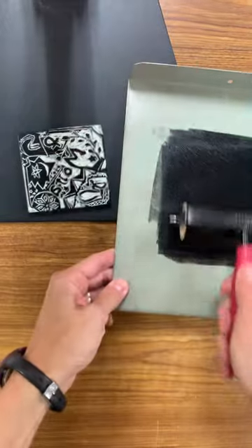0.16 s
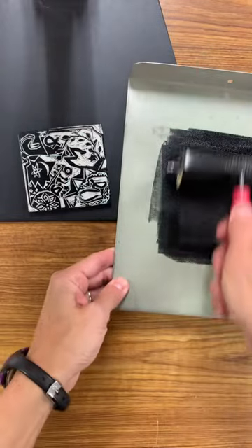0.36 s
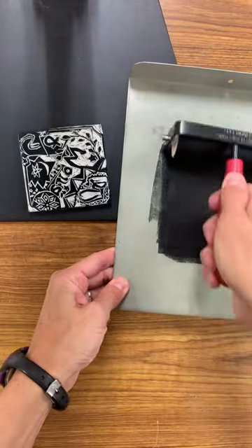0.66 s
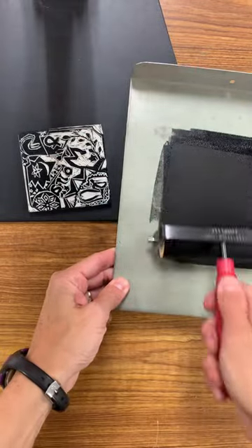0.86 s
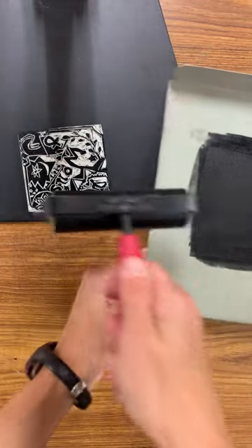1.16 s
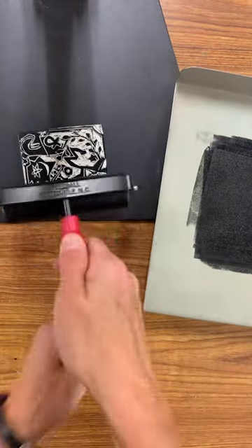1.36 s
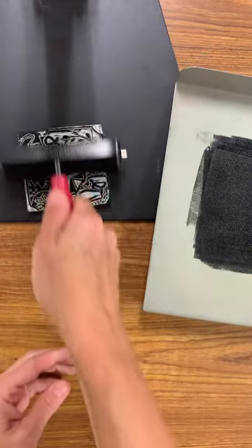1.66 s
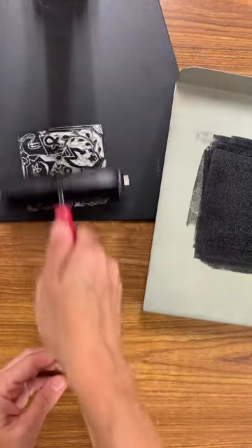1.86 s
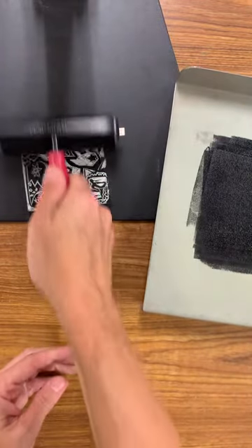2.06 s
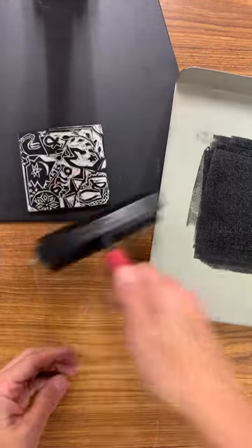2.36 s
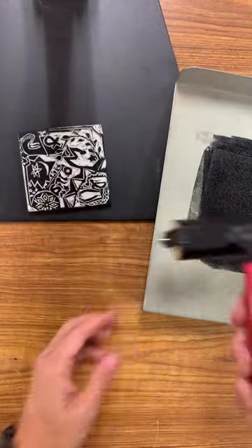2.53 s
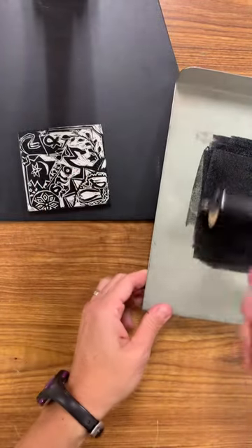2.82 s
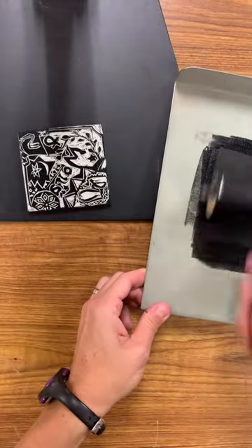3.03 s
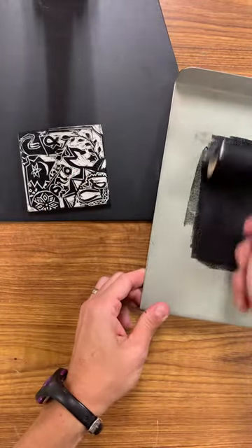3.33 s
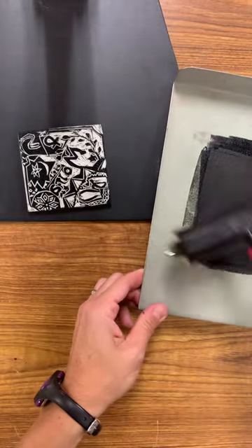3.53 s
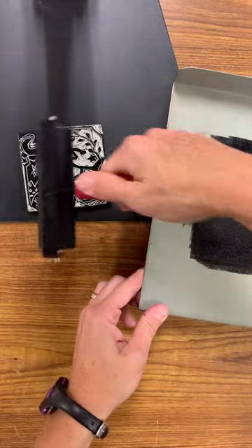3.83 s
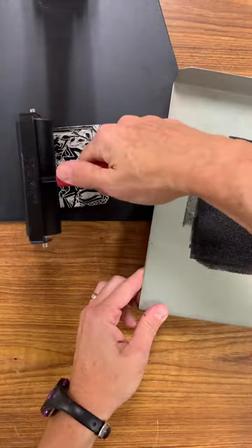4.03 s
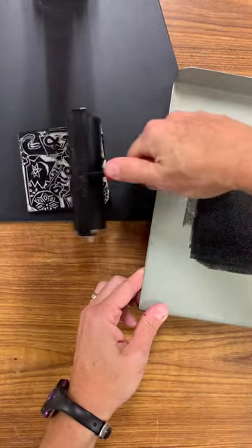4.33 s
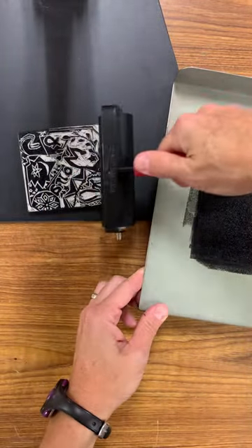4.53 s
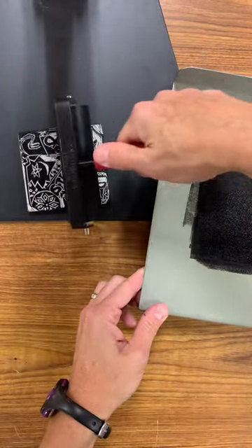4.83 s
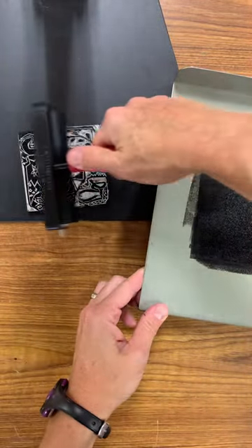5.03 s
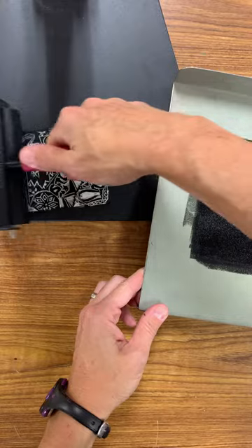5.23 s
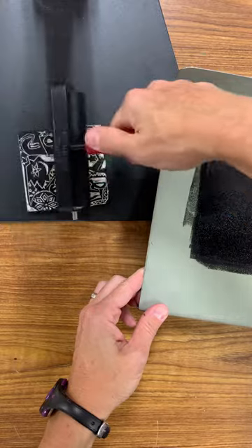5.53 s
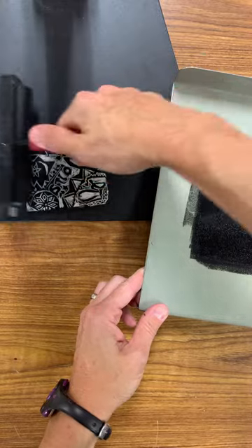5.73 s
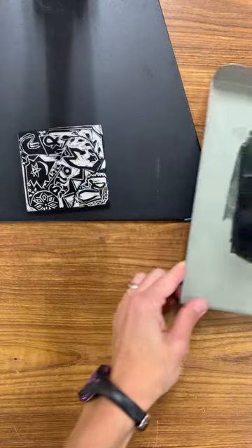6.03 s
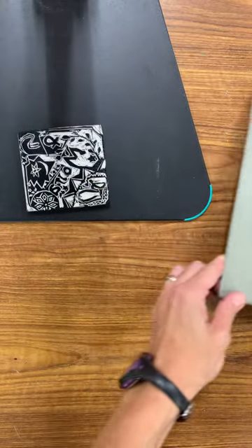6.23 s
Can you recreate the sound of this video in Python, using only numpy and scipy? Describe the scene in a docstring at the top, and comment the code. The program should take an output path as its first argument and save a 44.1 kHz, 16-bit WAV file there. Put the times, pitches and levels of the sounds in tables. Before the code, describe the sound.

A rubber roller makes quick, sticky, hissing strokes through ink on a metal tray. The tray scrapes and clanks, then the roller rumbles softly over a carved block, thumping the wooden table. After a sharp clank come more sticky strokes, then three slower passes on the block, each starting with a click and thump. Finally the tray clanks and slides. Heard close from above in a quiet, humming room.

```python
"""Inking a block with a rubber roller

A rubber roller runs through sticky ink on a metal tray and over a carved block, on a wooden table.
Ink threads snap as a dense hiss, and surface bumps drive the bodies below into a rumble.
Impacts excite damped modes: the roller frame ticks, the table top thumps and the tray clanks.
The dragged tray judders by friction. A quiet room hums; two microphone ports hear it from above."""
import sys
import numpy as np
from scipy import signal
from scipy.fft import rfft, irfft
from scipy.io import wavfile
from scipy.ndimage import uniform_filter1d, map_coordinates

SR = 44100
rng = np.random.default_rng(int(sys.argv[2]) if len(sys.argv) > 2 else 0)


def put_to_file(sound):
    """Save the sound as 16-bit audio at rate SR, in the file named by the first command-line argument."""
    columns = np.atleast_2d(sound).T  # one column per channel
    safe = np.clip(columns, -1, 1)
    whole_steps = np.round(safe * 32767)
    wavfile.write(sys.argv[1], SR, whole_steps.astype(np.int16))


N = 281221

# Ink hiss, one curve a stroke: time_s, thick_threads_gain_db, thin_threads_relative_db
INK_HISS = [
    [(0.14, -50.5, 8), (0.256, -51, 3.5), (0.264, -56, 6), (0.298, -53.5, 6), (0.327, -76, 3)],
    [(0.327, -76, 1), (0.353, -52.5, 8), (0.437, -48.5, 0), (0.445, -42.5, 1), (0.473, -56, 8),
     (0.507, -73, 2)],
    [(0.507, -72, 2), (0.529, -56.5, 14), (0.569, -44, 7), (0.583, -51, 9), (0.657, -48.5, 5.5),
     (0.693, -69, 4)],
    [(0.693, -76, 4), (0.715, -52.5, 12.5), (0.739, -49.5, 4), (0.853, -50, 4.5), (0.875, -51, 3)],
    [(1.58, -53, 2), (1.598, -60, 3), (1.624, -65, 15.5), (1.676, -59.5, 12.5), (1.734, -68.5, 11),
     (1.778, -89, 7)],
    [(1.778, -87, 9), (1.802, -78, 14), (1.822, -65, 15), (1.846, -55.5, 3), (1.886, -57.5, 4),
     (1.92, -69.5, 7), (1.951, -94, 7)],
    [(1.951, -93, 10), (1.977, -66.5, 11.5), (2.033, -56, 11), (2.075, -61.5, 9), (2.13, -80, -3)],
    [(2.13, -78.5, -3), (2.162, -71.5, 11.5), (2.206, -57, 11), (2.236, -58.5, 5), (2.265, -52, -5)],
    [(2.67, -85.5, -1), (2.688, -66, -8), (2.712, -66.5, -13.5), (2.742, -73, -12), (2.75, -49, -24)],
    [(2.83, -52, 1), (2.894, -58.5, 7), (2.934, -52.5, 4), (2.956, -67, 5), (2.965, -69, 0)],
    [(2.965, -65, 2), (2.991, -52.5, 8), (3.055, -48.5, 1), (3.073, -46, 1), (3.119, -54, 3),
     (3.145, -75, 4)],
    [(3.145, -64, 1), (3.161, -54, 0), (3.173, -53.5, 10), (3.201, -47.5, 6), (3.291, -49.5, 5),
     (3.317, -73, 4)],
    [(3.317, -75, 5), (3.333, -53, 6), (3.345, -51.5, 6.5), (3.433, -48, 3), (3.461, -53, 6.5),
     (3.485, -64, -4), (3.51, -72, -3)],
    [(4.12, -50, -6), (4.14, -60.5, 1), (4.242, -72, 3.5), (4.284, -70, 3), (4.358, -79, 10),
     (4.394, -74, 5.5), (4.46, -74, 2)],
    [(4.93, -60, 7.5), (4.982, -65.5, 6), (5.098, -72.5, 20), (5.17, -74, 17.5), (5.184, -72, 14),
     (5.19, -69, 11)],
    [(5.585, -47, -1), (5.591, -58, 7), (5.631, -66, 10.5), (5.699, -68, 14), (5.711, -59, -9),
     (5.719, -76, 9), (5.735, -78, 0)],
]
# Spectrum of snapping ink: frequency_hz, gain_db
INK_SPECTRUM = [(1500, 0.5), (3000, -20), (4000, -6), (4500, -13), (6000, 0), (9000, 0.5), (12000, 0.5),
                (15500, 1.5)]
# Strokes on the tray: start_s, end_s, fastest_at_fraction, tray_rumble_db, table_rumble_db
TRAY_STROKES = [(.135, .325, 0.52, -46, -38.5), (.335, .503, 0.4, -44.5, -44.5),
                (.513, .69, 0.4, -43, -52.5), (.7, .897, 0.64, -47, -44.5), (2.67, 2.75, .7, -54, -62.5),
                (2.81, 2.962, 1, -50.5, -44.5), (2.972, 3.142, 0.4, -42.5, -42.5),
                (3.15, 3.313, 0.46, -46.5, -46), (3.325, 3.505, 0.8, -48.5, -43)]
# Strokes on the block: start_s, end_s, fastest_at_fraction, block_rumble_db, table_rumble_db
BLOCK_STROKES = [(1.57, 1.78, 0.7, -48.5, -34.5), (1.785, 1.945, 0.43, -46, -35.5),
                 (1.96, 2.13, 0.43, -50, -31), (2.135, 2.28, 0.38, -43.5, -30.5),
                 (4.105, 4.49, .1, -56, -41.5), (4.91, 5.2, 0.83, -58, -38),
                 (5.57, 5.735, 0.96, -50.5, -34.5)]
# Knocks of the loose axle: time_s, peak_db, lower_mode_relative_db
AXLE_KNOCKS = [(1.682, -51, -2), (1.72, -55, 0), (1.77, -49, 0), (4.135, -48.5, -3), (4.17, -55.5, 3.5),
               (4.206, -44.5, -0.5), (4.253, -53, -1), (4.285, -44, 5), (4.334, -51.5, -3.5),
               (4.369, -58, 2.5), (4.406, -56, 4.5), (4.435, -61, 5), (4.48, -58, 2), (5.054, -48.5, -4),
               (5.071, -57, 0.5), (5.099, -57, -0.5), (5.146, -56.5, 4.5), (5.174, -56.5, 2),
               (5.635, -51, -2.5), (5.655, -49, -4), (5.69, -48, -4), (5.726, -40.5, -2.5)]
# Bumps over the ridges of the block: time_s, peak_db
RIDGE_KNOCKS = [(1.693, -38), (1.837, -37.5), (1.871, -54.5), (2.054, -38.5), (2.145, -38), (2.171, -36),
                (2.259, -42), (4.099, -33.5), (4.203, -53), (4.284, -50), (4.36, -41), (4.488, -45),
                (4.91, -39), (5.051, -51.5), (5.214, -44.5)]
# Ticks of the frame on its axle: time_s, peak_db, top_mode_relative_db, crack_s, rattle_relative_db
FRAME_TICKS = [(0.0993, -12.5, -3, 0.0053, -8), (0.107, -36, 7.5, 0.003, -15), (0.1176, 1, 5, 0.00079, -32),
               (0.125, -16, -16, 0.0021, -23), (0.8804, -31.5, -25, 0.0043, -4),
               (1.555, -15.5, 4, 0.0077, -13), (2.271, -23.5, -26.5, 0.0024, -16),
               (2.461, -19, -25, 0.0031, -7.5), (2.483, -30, -1, 0.0041, -12),
               (2.759, -15.5, -17, 0.0082, -33), (2.777, -5.5, -9, 0.003, -8),
               (4.0883, -8, 4.5, 0.0046, -19), (4.466, -48.5, -9, 0.0072, -25),
               (4.8987, -7, 6.5, 0.0037, -15.5), (5.199, -25, 1, 0.0055, -5.5),
               (5.557, -9, 2.5, 0.0055, -17), (5.701, -35, -17, 0.0028, -5),
               (6.33, -25.5, -21, 0.0026, -32)]
# Blows on the tray: time_s, peak_db, clatter_s, ring_time_fraction, then gain_db for each of 7 zones
TRAY_BLOWS = [(.004, -20, 0.012, 0.14, -5.5, -6.5, 1, -7, -12, -9, -9),
              (.024, -19.5, 0.013, .2, 7.5, 1, 1, -9, -13, -8.5, -19),
              (0.046, -18.5, 0.016, .3, 4.5, -6, 0, -9.5, -8.5, -9.5, -19.5),
              (.113, -15, 0.0087, 0.5, -1.5, 4.5, 1, -4, -3, -3, -8.5),
              (.122, -13.5, 0.009, 0.11, 14.5, 0.5, -0.5, -6.5, -2.5, -7.5, -11),
              (.874, -27.5, 0.014, .2, 11, 1, 2.5, -19.5, -20.5, -20.5, -18),
              (1.063, -26.5, 0.018, .2, -7.5, -11, 1.5, -8, -17.5, -5.5, -7.5),
              (1.083, -16.5, .012, 0.22, -15, -7, 1, -9, -17.5, -2.5, -3),
              (1.106, -21.5, 0.011, 0.17, -10.5, -15, -5.5, 5, -9, 4.5, -3),
              (1.133, -15.5, 0.014, 0.25, -16, -9, 0, 1, -9, -5, -8),
              (1.143, -6.5, .014, 0.37, -9, 2.5, 4, -22, -24, -13.5, -23),
              (1.181, -23.5, 0.0081, 0.25, -5, -6, -3.5, -13.5, -18, -9.5, -10),
              (1.284, 0.5, .015, 0.54, -11, -7.5, 0.5, 2, -2.5, 4, 6.5),
              (1.303, -7.5, 0.012, 0.6, -6.5, -9.5, -0.5, 1.5, -5.5, -2, 10.5),
              (1.366, -10.5, 0.0096, 0.59, -2, -6.5, 0, -5, -1, -2.5, -6),
              (2.339, -46.5, .011, .2, 0.5, -2, 0.5, -0.5, -1, 0, -9.5),
              (2.768, -9.5, 0.016, .15, -4.5, -8, -2.5, 4, -2, 5, 0),
              (2.7836, 4, 0.0064, .12, -5, -9, -1, 3.5, 8, 6, 12),
              (3.045, -22, 0.0059, 0.433, 2, -4, -1, -4.5, -12, -6, -5.5),
              (3.158, -12, 0.01, 0.238, 2.5, -6, 1.5, -4, -9, -6, -9),
              (3.34, -29.5, 0.0062, 0.37, 4, 3.5, 2.5, -10, -10, -11, -22.5),
              (3.517, -17, 0.0048, 0.72, -28, -1, 4.5, 3.5, -3.5, -13, -25.5),
              (5.823, 2.5, 0.007, 0.185, -4.5, -10, -1, -1, 7.5, -4.5, 9),
              (5.845, -19.5, 0.019, .3, 6, 11, -8, -7, -9, -9, 2),
              (5.868, -21, .02, .3, 3, 5, -2, -13, -19, -9, 3),
              (5.895, -12.5, 0.018, 0.052, 8, 9, 1, -17, -13, -20, -3)]
# Low thumps of the table top from landings, rolling bumps and tray knocks:
# time_s, peak_db, ring_time_ratio, lowest_mode_relative_db
TABLE_THUMPS = [(0.118, -16.5, 1.5, 14.5), (0.147, -18.5, .56, 1), (0.199, -32.5, .9, -4.5),
                (0.883, -24, .9, 5.5), (1.141, -32, 1.7, -3.5), (1.28, -26.5, 1.5, -6.5),
                (1.563, -13, .62, 3.5), (1.618, -22, 1.2, 0.5), (1.69, -24, .9, 10.5),
                (1.848, -23, 1.05, 20.5), (1.884, -24, 1.4, 7), (2.019, -23.5, .9, 10.5),
                (2.205, -17, 1.8, -6.5), (2.266, -17.5, .9, 13), (2.784, -15.5, 1.2, 7.5),
                (3.152, -36.5, 1.6, -14), (3.478, -33, 1.2, -4), (3.519, -33.5, 1.5, 19),
                (4.094, -9.5, 1.08, 10.5), (4.113, -13, .46, 15), (4.168, -32, .9, -5),
                (4.209, -32, .9, 28), (4.486, -26, 1.6, 11), (4.506, -46, 1.7, 17.5),
                (4.904, -11.5, .97, 5.5), (5.119, -39, .8, 6), (5.223, -34.5, 1.1, 12),
                (5.566, -9.5, .75, 0.5), (5.684, -28.5, .9, -6), (5.725, -32.5, 1.2, 6),
                (5.825, -28, .92, -16)]
# Drags of the tray over the table, one curve a slide: time_s, level_db
SLIDES = [
    [(0.0, -27), (0.032, -38), (0.04, -53), (0.046, -47), (0.092, -34), (0.096, -32)],
    [(0.96, -59), (0.978, -45), (1.018, -33), (1.048, -34.5), (1.088, -34), (1.124, -33.5), (1.148, -36),
     (1.164, -30.5), (1.27, -42)],
    [(1.33, -26), (1.36, -23), (1.366, -26), (1.396, -28.5), (1.406, -26), (1.54, -44.5)],
    [(5.74, -42), (5.752, -63), (5.806, -42.5), (5.81, -22)],
    [(5.845, -28), (5.879, -41), (5.909, -36.5), (5.923, -39.5), (5.973, -38.5), (6.05, -40.5), (6.13, -37),
     (6.2, -36.5), (6.24, -38.5), (6.287, -36.5), (6.377, -36.5)],
]
# Balance of each slide: scrape_gain_db, table_gain_db, then gain_db for each of 7 zones
SLIDE_MIX = [(-19, 7.5, 7, 7, 0, -2, -2, -5.5, -14), (-9, -14.5, -4, -1.5, 2, 0.2, 1.5, 3, -1),
             (-21.5, -14, -12, -10, 0.91, -0.16, -3.5, -2.5, -0.5), (-9, -15, 2, 3.5, 0, 0, 0, 0, 1),
             (-1, -17, -41, -16.5, 0, -2.9, 5.5, -1, 7)]

# Modes of the table top, block, roller frame and axle: pitch_hz, gain_db, t60_s
TABLE_MODES = [(89.36, 1.5, 0.21), (147.6, 20, 0.12), (176, -15, 0.017), (257, -29, 0.016)]
BLOCK_MODES = [(431, 6.5, 0.09), (587.5, 9, 0.062), (730, 3.5, 0.023), (2404, -5.5, 0.082),
               (3616, -20.5, 0.072)]
FRAME_MODES = [(1650, 0, .006), (3300, 0, .006), (4950, -8, .006), (6000, -3, .005), (8000, -4, .006),
               (9800, -1, .011), (11800, -6, .006), (13975, 0, .04)]
AXLE_MODES = [(1034, 0.5, 0.08), (1490, 1, 0.078)]
# Natural frequencies of the tray: pitch_hz
TRAY_HZ = [409, 593, 632, 770, 835, 890, 975, 1039, 1212, 1325, 1492, 1622, 1700, 1840, 2005, 2320, 2473,
           2640, 2934, 3062, 3500, 3813, 4129, 4528, 5450, 6277, 6670, 6971]
# Response of each tray mode before the hand damps it: gain_db, t60_s
TRAY_RING = [(1.5, 0.89), (-12, 0.041), (-3, 0.94), (-2, 0.49), (-4.5, 0.45), (2.5, 0.18), (-14, 0.094),
             (-2.5, 0.13), (2.5, 0.11), (-2, 0.2), (-8, 0.4), (1, 0.53), (-14.5, 0.12), (-27, 0.65),
             (-30, 0.11), (-16, 0.61), (-14, 0.62), (-25, 0.53), (-19.5, 0.18), (-14.5, 0.26),
             (-22.5, 0.098), (-24.5, 0.13), (-19, 0.38), (-13.5, 0.53), (-19, 0.22), (-20, 0.63),
             (-20, 0.3), (-36, 0.064)]
# Borders between the zones of tray modes that respond together: upper_edge_hz
ZONE_EDGES_HZ = [500, 700, 1150, 1550, 1750, 2200]
# Coupling of rolling to each zone: gain_db
ROLL_COUPLING_DB = [2.5, 0, 0, -3, 2.5, -16, -7.5]
# Coupling of dragging to each tray mode below 4.6 kHz: gain_db
DRAG_COUPLING_DB = [-1, -10.5, 1, -2.5, -6, -0.5, -1, -4.5, -2, -3.5, -8, -1.5, -10.5, -11.5, -27.5, -11,
                    -14.5, -21.5, -27.5, -17.5, -21.5, -23, -16, -18.5]
# Spectra of the scrape and of the ventilation: frequency_hz, gain_db
SCRAPE_SPECTRUM = [(500, -33), (1000, 2.5), (1700, 13), (2400, -10.5), (3400, -6), (4600, -2.5), (6000, -1),
                   (9000, -10.5), (12000, -12), (15500, -12.5)]
HUM_SPECTRUM = [(15, -57), (25, -18.5), (41, -23.5), (64, -1.5), (87, -24), (102, -11.5), (175, -17),
                (277, -26), (317, -29.5), (463, -34), (545, -39.5), (4870, -65.5), (16000, -63)]
# Response of the two microphone ports: frequency_hz, left_lag_rad, left_minus_right_db
PORT_RESPONSE = [(0, -.3, .1), (150, -.6, .1), (350, -.75, -.5), (600, -.6, 2), (850, -.1, 5),
                 (1200, -.3, 1.5), (1700, -.6, 1.5), (2400, 1.1, -.3), (3100, .5, .1), (3800, 1.2, .3),
                 (4500, 2.4, 0), (9000, 9.45, 0), (17000, 22.1, 0)]


def ink_hiss():
    """Rupture: countless ink threads snap behind the roller and merge into a patchy hiss."""
    patchy_db, lift_db, split_hz = 3, 5, 9500
    snaps = colour(grains(9000, spread_db=1.5) + rng.standard_normal(N), INK_SPECTRUM)
    hz, t, spectrum = signal.stft(snaps, SR, nperseg=256)
    grid = np.meshgrid(hz / 1000, t * 40, indexing="ij")  # patches 1 kHz wide and 25 ms long
    patches = map_coordinates(rng.standard_normal((24, 260)), grid, order=1)
    threads = signal.istft(spectrum * undb(patchy_db * patches), SR, nperseg=256)[1][:N]
    thick = unit(butterworth(threads, 3, split_hz, "low"))
    thin = unit(butterworth(threads, 3, split_hz, "high"))
    thick_gain = envelopes([[(s, db + lift_db) for s, db, _ in curve] for curve in INK_HISS])
    thin_gain = envelopes([[(s, db + rel + lift_db) for s, db, rel in curve] for curve in INK_HISS])
    return thick_gain.sum(axis=0) * thick + thin_gain.sum(axis=0) * thin


def rolling_rumble(strokes, *bodies):
    """Forced vibration: surface bumps under the roller drive the modes of the bodies below it."""
    bumps = [grains(1500, spread_db=2) * undb(4 * wander(per_s=25)) for _ in bodies]
    gains = stroke_envelopes(strokes)
    return sum(gain * unit(ring(force, modes)) for gain, force, modes in zip(gains, bumps, bodies))


def stroke_envelopes(strokes):
    """Excitation grows with speed: each body's rumble swells and fades as the roller runs and stops."""
    attack_s, release_s, t60_s, swell_db = 0.022, 0.029, 0.037, 6.5
    t, out = np.arange(N) / SR, 0
    for start_s, end_s, fastest_at, *rumble_db in strokes:
        progress = (t - start_s) / (end_s - start_s)
        speed = np.sin(np.pi / 2 * np.interp(progress, [0, np.clip(fastest_at, .1, .9), 1], [0, 1, 0]))
        onset_db = -15 * np.maximum(1 - (t - start_s) / attack_s, 0) ** 2
        decay_db = -60 * np.maximum(t - end_s + release_s, 0) / t60_s
        shape_db = onset_db + decay_db - swell_db * (1 - speed)
        out = out + np.array([undb(db + shape_db) for db in rumble_db])
    return out


def roller_knocks():
    """Impact excitation: the loose axle rattles, and ridges ring the block's three lowest modes."""
    out = np.zeros(N)
    for time_s, peak_db, lower_db in AXLE_KNOCKS:
        modes = [(hz, db + lower_db * (hz < 1200), t60) for hz, db, t60 in AXLE_MODES]
        add(out, time_s, ring(burst(length_s=.02, swell=0.084), modes), peak_db)
    for time_s, peak_db in RIDGE_KNOCKS:
        add(out, time_s, ring(burst(length_s=0.019, swell=0.12), BLOCK_MODES[:3]), peak_db)
    return out


def tray_slides():
    """Stick-slip friction: the tray judders over varnish, and the moving contact varies its modes."""
    judder_db, mode_swing_db, glide_fraction = 1.34, 3, .012
    drag = envelopes(SLIDES) * undb(judder_db * wander(per_s=41))
    scrape_gain, table_gain, *zone_gains = undb(SLIDE_MIX).T @ drag
    slips = grains(3000, spread_db=2)
    tones = []
    for hz, db in zip(TRAY_HZ, DRAG_COUPLING_DB):
        force = slips * undb(mode_swing_db * wander(per_s=12))
        pitch_hz = hz * (1 + glide_fraction * wander(per_s=9))
        tones.append(undb(db) * gliding_mode(force, pitch_hz, t60_s=.08))
    tray = sum(zone_gains[zone(hz)] * tone for tone, hz in zip(tones, TRAY_HZ)) / np.std(sum(tones))
    scrape = scrape_gain * unit(colour(slips, SCRAPE_SPECTRUM))
    return tray + scrape + table_gain * unit(ring(slips, TABLE_MODES))


def frame_ticks():
    """Hard contact is broadband: metal cracks on metal, rings the frame and leaves a brief rattle."""
    rattle_rise_s, rattle_t60_s, wash_t60_s = 0.00073, 0.068, 0.11
    out, t = np.zeros(N), np.arange(6000) / SR
    rattle_shape = undb(-60 * t / rattle_t60_s) * np.minimum(t / rattle_rise_s, 1)
    for time_s, peak_db, top_db, crack_s, rattle_db in FRAME_TICKS:
        force = burst(crack_s, swell=0.28) + undb(rattle_db) * rng.standard_normal(len(t)) * rattle_shape
        band_edges_hz, band_db = [4000, 9000, 13000], [-6.5, 0, 4.5, top_db]
        modes = [(hz, db + band_db[np.digitize(hz, band_edges_hz)], t60) for hz, db, t60 in FRAME_MODES]
        crack = unit(butterworth(force, 3, [4500, 13000], "band"))
        add(out, time_s, unit(ring(force, modes)) + 1.51 * crack, peak_db)
        wash = noise_tail(t, [5200, 8500], wash_t60_s)  # the rattle lingers over the table top
        add(out, time_s, wash, peak_db + rattle_db - 10.5)
    return out


def tray_clanks():
    """Plate vibration: the point of impact weights the modes, and brighter blows rattle the rim more."""
    brightening, rim_db = 0.17, -30.5  # brightening: dB gained above 4 kHz for each dB of blow
    out, t = np.zeros(N), np.arange(20000) / SR
    for time_s, peak_db, clatter_s, ring_fraction, *zone_db in TRAY_BLOWS:
        modes = []
        for hz, (db, t60) in zip(TRAY_HZ, TRAY_RING):
            gain_db = db + zone_db[zone(hz)] + brightening * peak_db * (hz > 4000)
            damped_t60_s = ring_fraction * t60 * (.6 if hz > 2100 else 1)
            modes.append((hz * (1 + 0.0021 * rng.standard_normal()), gain_db, damped_t60_s))
        # a second set, detuned and damped while the roller still presses
        modes += [(hz * (1 + 0.016 * rng.standard_normal()), db + 15, .51 * t60) for hz, db, t60 in modes]
        force = burst(clatter_s, swell=0.27, samples=len(t))
        # each mode takes up energy in step with its strength and ring time
        clank = sum(np.sqrt(t60) * undb(db) * unit(ring(force, [(hz, 0, t60)])) for hz, db, t60 in modes)
        add(out, time_s, clank, peak_db)
        rim = noise_tail(t, [3000, 8000], t60_s=0.46 * ring_fraction)
        add(out, time_s, rim, peak_db + zone_db[-1] + rim_db)
    return butterworth(out, 3, 340, "high")  # a thin sheet radiates little below its lowest mode


def table_thumps():
    """A slow push excites low modes: the table top thumps, and its pitch sags as the pressure eases."""
    push_s, sag_s, sharp_fraction = 0.0097, 0.03, 0.16
    out, t = np.zeros(N), np.arange(16000) / SR
    warped_s = t + sharp_fraction * sag_s * (1 - np.exp(-t / sag_s))
    onset = 1 - np.exp(-(t / push_s) ** 2)
    for time_s, peak_db, ring_ratio, lowest_db in TABLE_THUMPS:
        thump = 0
        for hz, db, t60 in TABLE_MODES:
            decay = undb(db + lowest_db * (hz < 110) - 60 * t / (t60 * ring_ratio))
            thump = thump + decay * np.sin(2 * np.pi * hz * warped_s)
        add(out, time_s - .003, thump * onset, peak_db)
    return out


def microphone_ports(x):
    """Path difference: phase and level differ at two ports; in the midrange the tray's modes radiate with
    scattered phase."""
    hz, lag_rad, balance_db = np.transpose(PORT_RESPONSE)
    bins_hz = np.arange(N // 2 + 1) * SR / N
    scatter_rad = np.interp(bins_hz, np.linspace(1700, 4300, 28), np.r_[0, rng.standard_normal(26), 0])
    phase_rad = np.interp(bins_hz, hz, lag_rad) + scatter_rad
    half = undb(np.interp(bins_hz, hz, balance_db) / 2) * np.exp(-.5j * phase_rad)
    return np.array([irfft(rfft(x) * half, N), irfft(rfft(x) / half, N)])


def room_reverberation(x):
    """Diffuse reflection: a dull tail over a faint longer one, only partly alike at the two ports."""
    early_t60_s, late_t60_s, late_db = 0.12, 0.89, -19
    t = np.arange(SR) / SR
    decay = undb(-60 * t / early_t60_s) + undb(late_db - 60 * t / late_t60_s)
    tails = butterworth(rng.standard_normal((3, len(t))) * decay, 2, [330, 3100], "band")
    tails /= np.sqrt(np.sum(tails ** 2) / 3)
    common, *separate = undb(-15) * signal.fftconvolve(x[None], tails, axes=1)[:, :N]
    return microphone_ports(common) + 0.66 * np.array(separate)


def ventilation_hum():
    """Coherence at long wavelengths: the wavering rumble is alike at both ports in the bass."""
    level_db, waver_db, crossover_hz = -47.5, 0.5, 500
    common, left, right = (colour(rng.standard_normal(N), HUM_SPECTRUM) for _ in range(3))
    bass = butterworth(common, 1, crossover_hz, "low")
    treble = butterworth([left, right], 1, crossover_hz, "high")
    waver = unit(uniform_filter1d(rng.standard_normal(N), size=6000))
    return undb(level_db + waver_db * waver) * unit(bass + treble)


def ring(force, modes):
    """Modal superposition: a body responds as a sum of damped resonators."""
    out = 0
    for hz, db, t60 in modes:
        pole = np.exp(2j * np.pi * hz / SR - np.log(1000) / (t60 * SR))
        out = out + undb(db) * signal.lfilter([1], [1, -pole], force).imag
    return out


def gliding_mode(force, pitch_hz, t60_s):
    """A driven resonator whose phase is the integral of a moving frequency."""
    phasor = np.exp(2j * np.pi * np.cumsum(pitch_hz) / SR)
    return (signal.lfilter([1], [1, -undb(-60 / t60_s / SR)], force / phasor) * phasor).imag


def grains(per_s, spread_db):
    """Shot noise: random clicks of uneven size, rms 1."""
    chance, size, sign = rng.random((3, N))
    return unit((chance < per_s / SR) * undb(-spread_db * np.log(size + 1e-9)) * np.sign(sign - .5))


def burst(length_s, swell, samples=6000):
    """A clatter of contacts: noise with a linear rise and a Gaussian decay."""
    progress = np.arange(samples) / (length_s * SR)
    return rng.standard_normal(samples) * np.minimum(progress / swell, 1) * np.exp(-progress ** 2)


def noise_tail(t, band_hz, t60_s):
    """Band-limited noise in exponential decay."""
    return butterworth(rng.standard_normal(len(t)), 2, band_hz, "band") * undb(-60 * t / t60_s)


def wander(per_s):
    """Slow random modulation with a standard deviation near 1."""
    knots = int(N / SR * per_s) + 2
    return np.interp(np.arange(N) * per_s / SR, np.arange(knots), rng.standard_normal(knots)) * 1.22


def envelopes(curves):
    """A smoothed gain for each curve of (time_s, level_db), silent outside it."""
    t = np.arange(N) / SR
    gains = [undb(np.interp(t, *np.transpose(curve), left=-200, right=-200)) for curve in curves]
    return uniform_filter1d(gains, size=250, axis=1)


def colour(x, points):
    """Spectral shaping by (frequency_hz, gain_db) points on a logarithmic frequency axis."""
    hz, db = np.transpose(points)
    bins_hz = np.maximum(np.arange(N // 2 + 1) * SR / N, 1)
    return irfft(rfft(x) * undb(np.interp(np.log(bins_hz), np.log(hz), db)), N)


def add(out, time_s, x, peak_db):
    """Superpose x on out at the given time and peak level."""
    start = int(time_s * SR)
    x = x[:N - start]
    out[start:start + len(x)] += x * undb(peak_db) / np.abs(x).max()


def butterworth(x, order, edge_hz, kind):
    return signal.sosfilt(signal.butter(order, edge_hz, kind, fs=SR, output="sos"), x)


def zone(hz):
    return np.searchsorted(ZONE_EDGES_HZ, hz)


def undb(db):
    return 10 ** (np.asarray(db) / 20)


def unit(x):
    return x / np.sqrt(np.mean(x ** 2))


def scene():
    """Superposition: direct sound, reverberation and hum add at the two ports."""
    held_t60_s = .045  # roller and hand damp the tray
    held_tray = [(hz, ROLL_COUPLING_DB[zone(hz)], held_t60_s) for hz in TRAY_HZ if hz < 2600]
    direct = ink_hiss() + rolling_rumble(TRAY_STROKES, held_tray, TABLE_MODES)
    direct += rolling_rumble(BLOCK_STROKES, BLOCK_MODES, TABLE_MODES)
    direct += roller_knocks() + tray_slides() + frame_ticks() + tray_clanks() + table_thumps()
    direct = butterworth(direct, 3, 77, "high")  # the microphone cuts the deep bass
    return microphone_ports(direct) + room_reverberation(direct) + ventilation_hum()


def record(dry):
    """Saturation and band limiting: the phone rounds the loudest peaks and cuts above 16 kHz."""
    rounded = np.tanh(0.75 * dry) / 0.92
    return signal.sosfilt(signal.ellip(8, .2, 70, 16000, fs=SR, output="sos"), rounded)


dry = scene()
out = record(dry)
put_to_file(out)
```